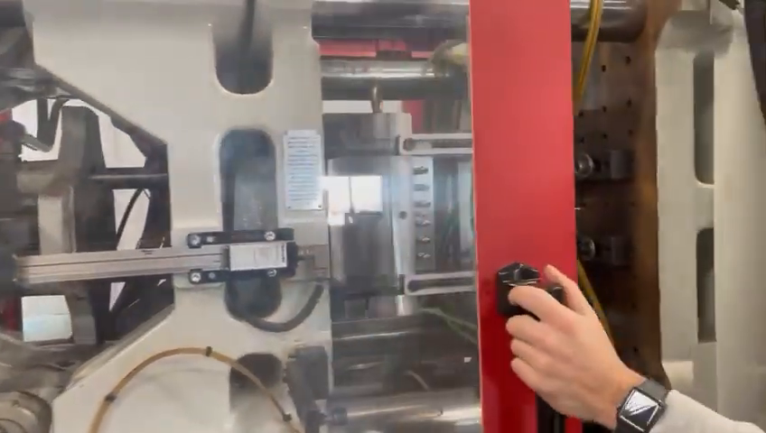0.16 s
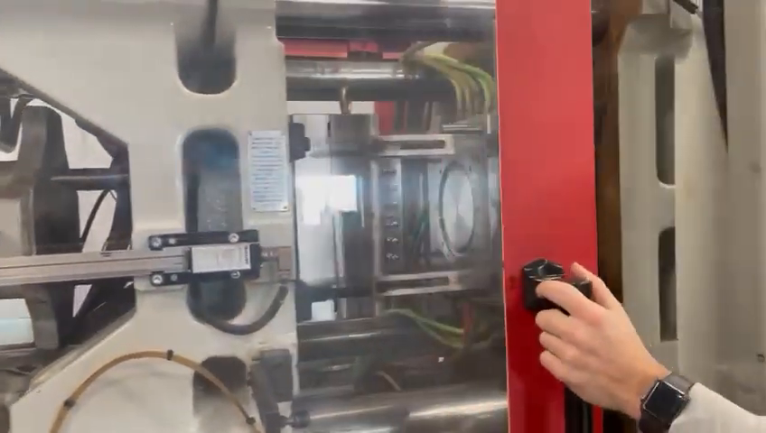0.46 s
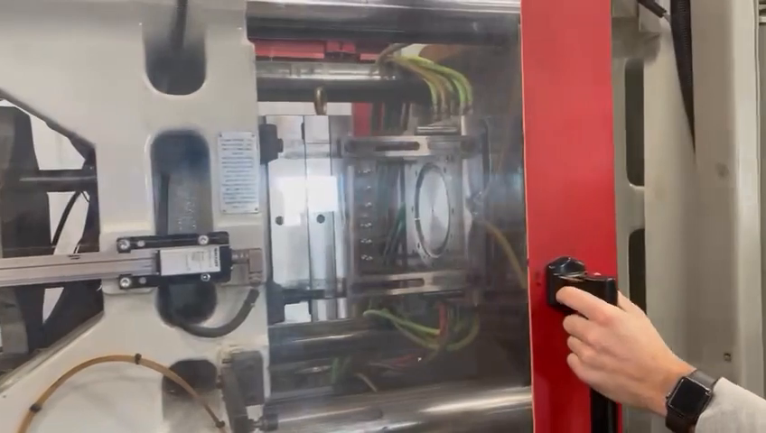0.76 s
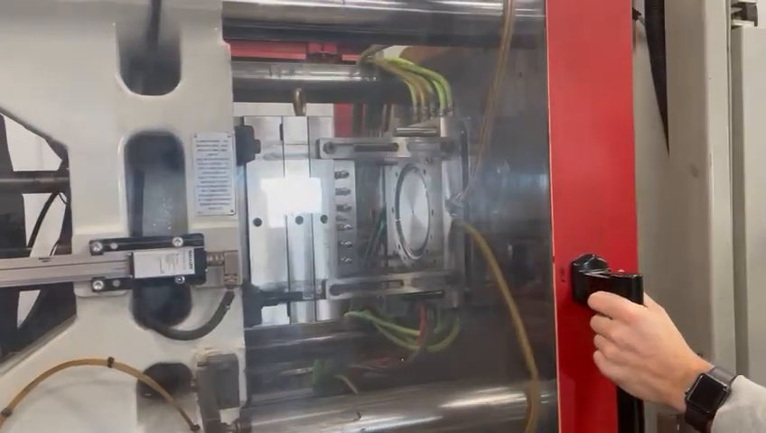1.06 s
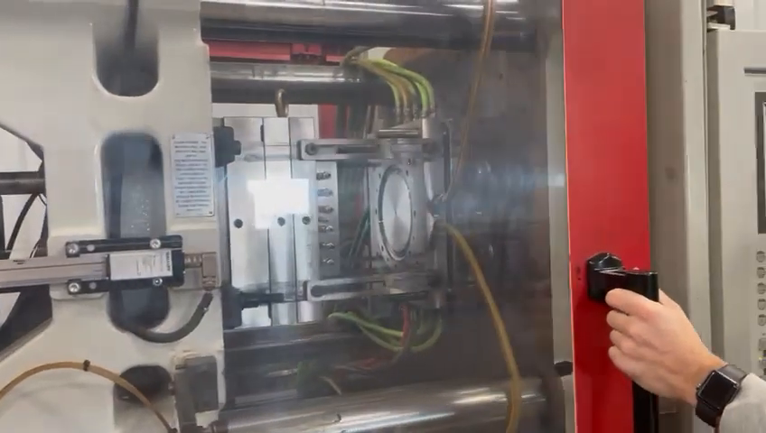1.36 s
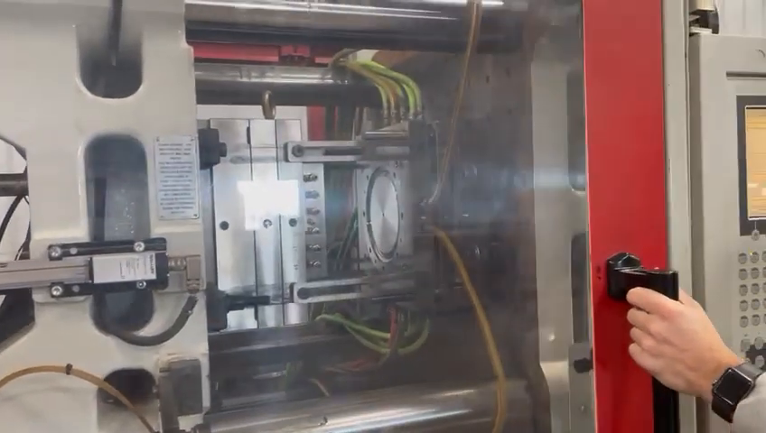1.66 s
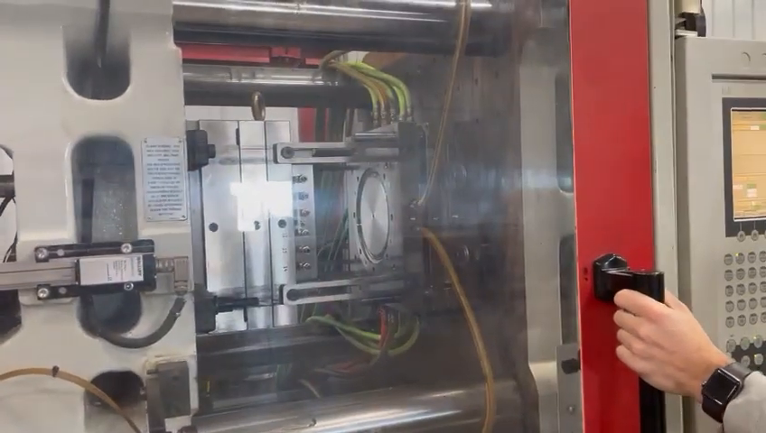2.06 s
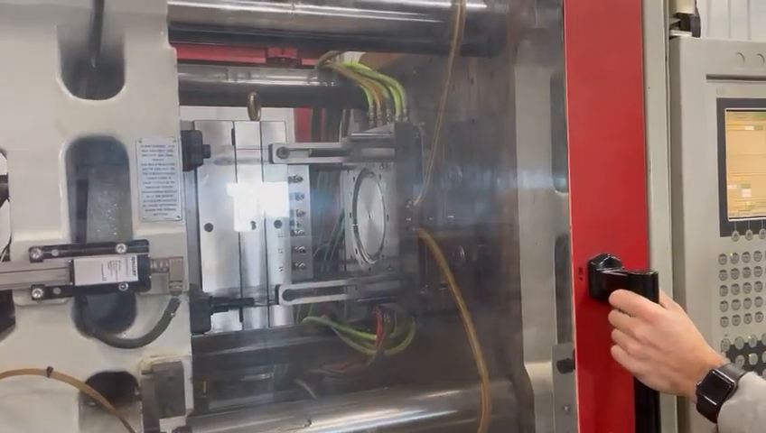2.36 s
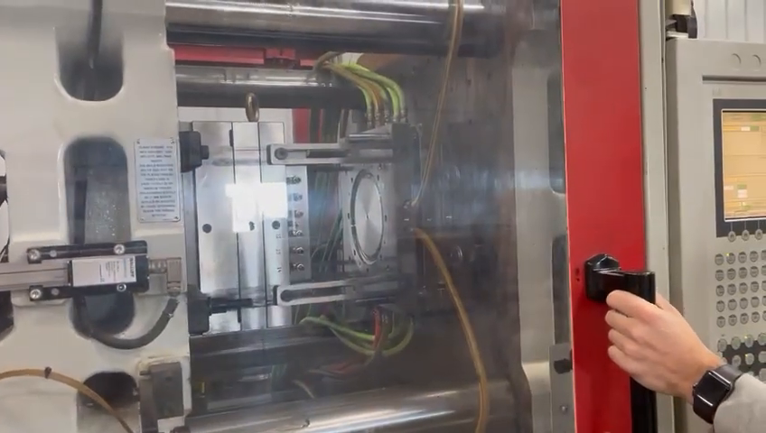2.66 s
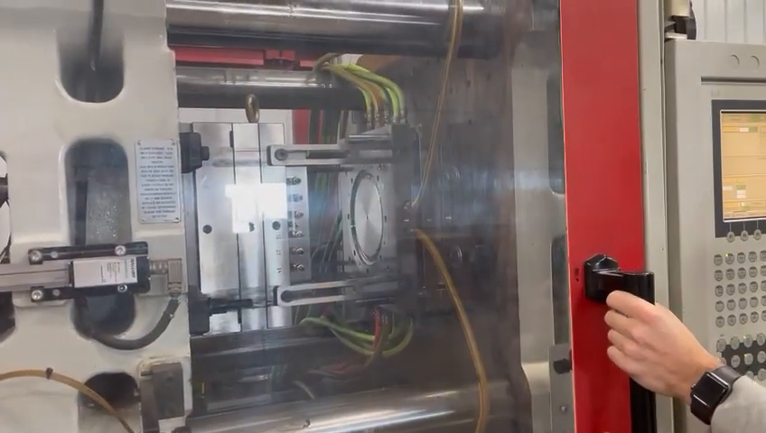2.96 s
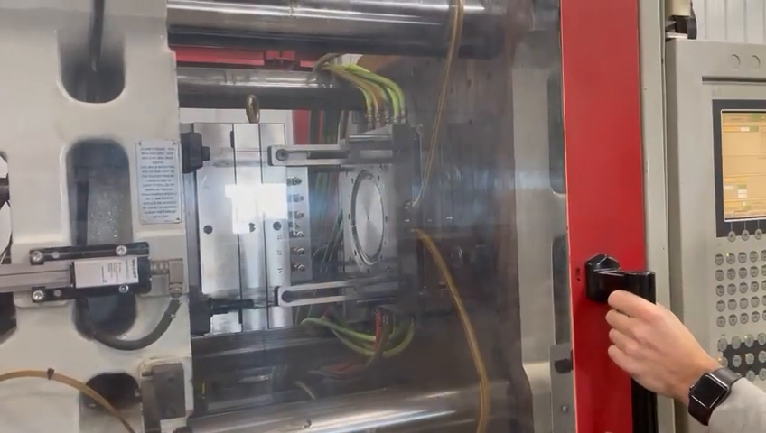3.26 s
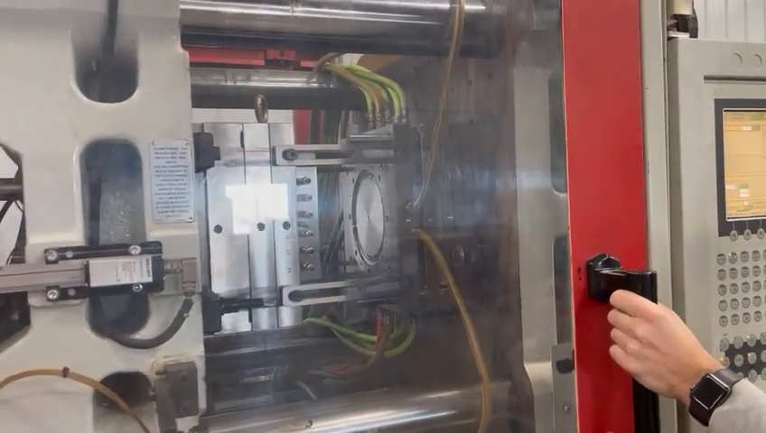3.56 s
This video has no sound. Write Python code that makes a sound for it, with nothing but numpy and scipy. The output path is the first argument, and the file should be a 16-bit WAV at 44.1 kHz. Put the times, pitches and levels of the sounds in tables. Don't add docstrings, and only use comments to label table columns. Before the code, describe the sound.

A sliding machine door rumbles and scrapes, then latches with three metallic clacks and a thud; motor hum and hall roar continue, and a burst of air and a heavy thump end it, heard close in stereo.

```python
import sys
import numpy as np
from scipy import signal
from scipy.fft import rfft, irfft
from scipy.io import wavfile
from scipy.ndimage import uniform_filter1d

SR = 44100
rng = np.random.default_rng(int(sys.argv[2]) if len(sys.argv) > 2 else 0)


def rack_gain(trim_db):
    fader = np.asarray(trim_db, float)
    return 10 ** (fader / 20)


def int16_out(signal):
    q = np.round(np.clip(np.atleast_2d(signal).T, -1, 1) * 32767)
    wavfile.write(sys.argv[1], SR, q.astype(np.int16))


N = 163170
SIZE = 3 * 2 ** 16
FREQ = np.fft.rfftfreq(SIZE, 1 / SR)
T = np.arange(N) / SR


def over_hz(table):
    hz, value = np.array(table).T
    return np.interp(np.log(FREQ + 1), np.log(hz), value)


def over_time(table):
    return np.interp(T, *np.array(table).T)


def shape(x, gain):
    return irfft(rfft(x, SIZE) * gain)[..., :N]


def unit(x):
    return x / np.sqrt(np.mean(x ** 2))


def noise(colour, channels=1):
    return unit(shape(rng.standard_normal((channels, N)), rack_gain(over_hz(colour))))


def resonance(hz, width_hz):
    return 1 / (1 + 2j * (FREQ - hz) / width_hz) ** 2


def walk(rate_hz):
    hold = max(int(SR / rate_hz), 2)
    steps = np.repeat(rng.standard_normal(N // hold + 1), hold)
    smooth = uniform_filter1d(uniform_filter1d(steps, hold), hold)
    return unit(smooth[:N])


def ring(x, hz, t60_s):
    radius = np.exp(-np.log(1000) / (t60_s * SR))
    turn = 2 * np.pi * hz / SR
    return signal.lfilter([np.sin(turn)], [1, -2 * radius * np.cos(turn), radius * radius], x)


def octaves(gain):
    white = rfft(rng.standard_normal((2, SIZE))) * gain
    for hz in 25 * 2 ** np.arange(0, 9.4, .66):
        distance = np.clip(np.log2((FREQ + 1) / hz) / .66, -1, 1)
        window = np.cos(distance * np.pi / 2) ** 2
        yield hz, irfft(white * window)[:, :N]


# hz, correlation (-1..1)
PORT_LIKENESS = [(60, .998), (130, .98), (270, .76), (600, .1), (1200, -.1), (2800, .5), (6200, .2),
                 (7000, -.995), (9100, -.995), (10000, .96)]


def spread(pair):
    likeness = np.clip(over_hz(PORT_LIKENESS), -1, 1)
    mid, side = shape(pair, np.sqrt(np.array([1 + likeness, 1 - likeness]) / 2))
    return np.array([mid + side, mid - side])


def tone(hz, level_db, wobble_db, drift=.002):
    phase = 2 * np.pi * (np.cumsum(hz * (1 + drift * walk(6))) / SR + rng.random())
    wobble = .6 * walk(7) + .8 * walk(np.clip(hz / 15., 8, 40))
    return np.sqrt(2) * rack_gain(level_db + wobble_db * wobble) * np.sin(phase)


# time_s, level_db
MOTOR_LEVEL = [(0, -45), (.04, -32), (.7, -34.5), (1.4, -36), (1.66, -34.5), (1.8, -38.5), (1.95, -33),
               (3.2, -31.5), (3.45, -33.5), (3.7, -33)]
# time_s, level_db
PUMP_LEVEL = [(0, -41.5), (.29, -49), (.5, -40.5), (.75, -44.5), (.9, -41.5), (1.47, -40.5), (1.78, -45.5),
              (1.95, -37.5), (2.3, -41), (3.1, -42.5), (3.7, -44)]
# multiple, level_db re first line, wobble_db
PISTON_ORDERS = [(1, 0, 1.5), (2, -8, 2), (4, -17, 2), (6, -17, 2.5), (7, -20, 2.5)]
# time_s, level_db
WHINE_LEVEL = [(0.0, -67), (0.02, -50), (0.13, -45.5), (0.31, -67), (0.36, -49), (0.53, -48), (0.77, -55.5),
               (0.94, -48.5), (1.26, -54), (1.29, -67), (1.32, -58), (1.48, -46.5), (2.59, -47.5),
               (3.2, -47.5)]
# pitch_hz, level_db, wobble_db
OTHER_DRIVES = [(120, -51, -3), (139.3, -54, -3.5), (243, -48.5, 6.5), (400.2, -46, 4), (698.6, -55, 3.5),
                (758.7, -49.5, 2)]
MOTOR_HZ, PISTON_HZ = 53.95, 372.9


def machines():
    lines = tone(MOTOR_HZ, over_time(MOTOR_LEVEL), 1.4, drift=.0023)
    for order, db, wobble_db in PISTON_ORDERS:
        level_db = over_time(PUMP_LEVEL) if order == 1 else db - 42
        lines = lines + tone(order * PISTON_HZ, level_db, wobble_db, drift=.00183)
    whine = tone(5 * PISTON_HZ, over_time(WHINE_LEVEL), 2, drift=.0012)
    lines = lines + whine * (T < WHINE_LEVEL[-1][0])
    return lines + sum(tone(hz, db, wobble_db, drift=.00411) for hz, db, wobble_db in OTHER_DRIVES)


# hz, density_db per Hz
HALL_COLOUR = [(25, -3), (70, -4), (220, -0.5), (520, -7), (1500, -13), (2700, -19.5), (4500, -28.5),
               (12000, -50)]
HALL_DB, SWELL_DB, FLICKER_DB = -37, .6, 1.5


def hall():
    swell = SWELL_DB * walk(3.34)
    bands = octaves(rack_gain(over_hz(HALL_COLOUR)))
    roar = sum(band * rack_gain(swell + FLICKER_DB * walk(7.84)) for _, band in bands)
    return spread(unit(roar)) * rack_gain(HALL_DB)


# time_s, level_db
ROLL_LEVEL = [(0, -42), (.31, -48.5), (.345, -39.5), (.42, -36.5), (.5, -35), (.6, -39.5), (.9, -47.5),
              (1.4, -49.5)]
# hz, density_db per Hz
ROLL_COLOUR = [(210, 4.5), (400, -3.5), (1500, -5.5), (1950, 2.5), (2500, -12), (6000, -19.5), (12000, -35)]
# pitch_hz, width_hz, level_db, start_s, end_s
RAIL_SCRAPES = [
    (1900, 350, -47, .345, .47),
    (203, 35, -42, -.01, .45),
]


def door():
    roll = noise(ROLL_COLOUR, channels=2) * rack_gain(over_time(ROLL_LEVEL) + 1.5 * walk(30))
    squeak = tone(2650, -54 - 25 * np.clip(T - .4, 0, 1), 2.5, drift=.0027)
    out = roll + squeak
    for hz, width_hz, db, start_s, end_s in RAIL_SCRAPES:
        rub = unit(shape(rng.standard_normal((2, N)), resonance(hz, width_hz)))
        fade = np.clip(np.minimum((T - start_s) / .01, (end_s - T) / .06), 0, 1)
        out = out + rack_gain(db) * rub * fade
    return out


# start_s, level_db, rise_s, rattle_decay_s, crack_db re rattle
CLACK_HITS = [
    (1.472, -25, .001, 0.0072, 7.5),
    (1.562, -23, .001, 0.02, -2.5),
    (1.682, -12.5, .0011, 0.0059, -1),
]
# pitch_hz, level_db, t60_s, swell_s
CATCH_MODES = [(2160, 4, .09, .001), (2550, -8, .04, .001), (2990, -7, .05, .001), (3800, -6, .04, .001),
               (4400, -8, .05, .001), (5300, -8, .05, .001), (8900, 0, .04, .001)]
STRIKER_MODES = [(950, -14, .08, .01), (1300, -6, .05, .005), (1497, 2, .17, .035), (2220, -1, .04, .002),
                 (2487, -6, .13, .03), (2724, -2, .13, .02), (3150, -5, .035, .001), (4172, -11, .1, .01),
                 (4409, -13, .1, .01), (5367, -12, .1, .005), (6735, -4, .07, .001), (9420, -9, .15, .005)]
LATCH_MODES = [(600, -18, .12, .01), (850, -13, .12, .01), (1100, -7, .13, .012), (1330, -1, .14, .015),
               (1470, -4, .14, .015), (1650, -9, .1, .01), (2250, -7, .1, .005), (2480, -2, .065, .002),
               (2720, 2, .03, .001), (3290, -13, .1, .005), (4156, -10, .06, .002), (6400, -8, .05, .001),
               (9324, -2, .15, .003), (10900, -15, .07, .002)]
# start_s, level_db re clack
REBOUNDS = [
    [(1.481, -9), (1.491, -15)],
    [(1.5676, -5), (1.579, -8), (1.594, -9), (1.604, -10), (1.617, -9), (1.671, -20), (1.676, -21)],
    [(1.688, -5), (1.704, -11), (1.714, -14), (1.733, -17), (1.743, -20), (1.753, -18), (1.776, -22)],
]
# hz, density_db per Hz
CRACK_COLOUR = [(600, -38), (1500, -24), (2000, -5), (2600, -1), (5000, -4), (8000, -3), (11000, -8),
                (13000, -18)]
REBOUND_S, BUZZ_DB, LOW_CUT_HZ = .004, -9, 450
CLUSTER_SPREAD, RING_SHARE = .022, .25


def clacks():
    out = 0
    parts = (CATCH_MODES, STRIKER_MODES, LATCH_MODES)
    for (start_s, db, rise_s, decay_s, crack_db), modes, rebounds in zip(CLACK_HITS, parts, REBOUNDS):
        t = np.clip(T - start_s, 0, None)
        onset = np.clip(t / rise_s, 0, 1)
        contact = onset * np.exp(-t / decay_s)
        for again_s, again_db in rebounds:
            rise = np.clip((T - again_s) / rise_s, 0, 1)
            contact = contact + rack_gain(again_db) * rise * np.exp(-np.abs(T - again_s) / REBOUND_S)
        grit = rng.standard_normal(N) * rack_gain(2 * walk(400))
        body = 0
        for hz, mode_db, t60_s, swell_s in modes:
            buzz = onset * rack_gain(BUZZ_DB - 60 * t / t60_s)
            swell = np.clip(t / max(swell_s, 1e-4), .1, 1)
            drive = grit * (contact + buzz) * swell
            spacing = CLUSTER_SPREAD * min(3000 / hz, 1) ** 2
            cluster = sum(ring(drive, hz * (1 + spacing * j), RING_SHARE * t60_s) for j in (-1, 0, 1))
            body = body + rack_gain(mode_db) * cluster
        body /= np.sqrt(uniform_filter1d(body ** 2, 441).max())
        crack = rack_gain(crack_db) * contact * noise(CRACK_COLOUR)[0]
        out = out + rack_gain(db) * (body + crack)
    return signal.sosfilt(signal.butter(4, LOW_CUT_HZ, "high", fs=SR, output="sos"), out)


# start_s, level_db, pitch_hz, t60_s
FRAME_THUDS = [
    (1.72, -31, 195.6, 0.17),
    (1.764, -23.5, 144.7, 0.14),
    (3.214, -43, 189, 0.12),
    (3.469, -21.5, 111.8, 0.52),
    (3.494, -20.5, 122.6, 0.21),
    (3.515, -23, 132, 0.17),
    (3.57, -26.5, 64.6, 0.23),
    (3.602, -26.5, 134.4, 0.12),
]
# multiple, level_db
FRAME_BODY = [(1, 0), (1.9, -6), (2.7, -12), (3.6, -22)]


def thuds():
    out = 0
    for start_s, db, hz, t60_s in FRAME_THUDS:
        push = np.clip(1 - np.abs(T - start_s - .002) / .0006, 0, 1)
        push = push / push.sum()
        body = sum(rack_gain(d) * ring(push, hz * k, t60_s / k ** .1) for k, d in FRAME_BODY)
        out = out + rack_gain(db) * body
    return 1.13 * out


# time_s, level_db
VALVE_LEVEL = [(3.195, -64), (3.222, -33.5), (3.23, -26.5), (3.276, -29.5), (3.29, -23), (3.33, -25),
               (3.375, -27.5), (3.42, -36), (3.5, -40.5), (3.7, -52)]
# pitch_hz, width_hz, level_db, start_s, fade_s
PIPE_MODES = [(880, 180, -10, 3.28, .1), (1170, 100, -4, 3.22, .2), (1490, 60, -5, 3.28, .2),
              (1780, 190, 5, 3.235, .14), (2000, 200, -4, 3.28, .12), (2540, 150, -8, 3.22, .2),
              (3070, 90, -8, 3.28, .15), (3800, 400, 0, 3.278, .07), (4000, 420, 2, 3.335, .16),
              (4600, 300, -11, 3.28, .2), (6700, 350, -8, 3.23, .3), (10200, 450, -11, 3.23, .12),
              (11100, 90, -8, 3.225, .06)]
# hz, density_db per Hz
JET_COLOUR = [(300, -16), (900, -2.5), (2000, -1), (4000, -11), (6500, -12), (8000, -12), (10600, -29.5),
              (11400, -57)]
JET_DB, PATCHY_DB = -1.5, 2.5
PUFF_S, PUFF_DB, PUFF_LENGTH_S = 3.208, -50, .012
WHISTLE_HZ, WHISTLE_DB, WHISTLE_S = 8100, -49, 3


def valve():
    air = rng.standard_normal((2, N))
    pipes = 0
    for hz, width_hz, db, start_s, fade_s in PIPE_MODES:
        opening = np.clip((T - start_s) / .02, .1, 1)
        fade = np.exp(-np.clip(T - start_s, 0, 1) / fade_s)
        pipe = shape(air, rack_gain(db) * resonance(hz, width_hz))
        pipes = pipes + pipe * opening * fade * rack_gain(PATCHY_DB * walk(45))
    puff = rack_gain(PUFF_DB) * air * np.exp(-((T - PUFF_S) / PUFF_LENGTH_S) ** 2)
    flutter_db = .8 * walk(50) + 1.5 * walk(400)
    blast = 6.0 * pipes + rack_gain(JET_DB) * noise(JET_COLOUR, channels=2)
    blast = blast * rack_gain(over_time(VALVE_LEVEL) + flutter_db) * (T > VALVE_LEVEL[0][0])
    whistle = tone(WHISTLE_HZ, WHISTLE_DB, 2.4, drift=.001) * np.clip((T - WHISTLE_S) / .027, 0, 1)
    return blast + puff, whistle


# hz, t60_s
HALL_T60 = [(150, 2.7), (1300, 1.9), (2600, .7), (6000, .6), (12000, 0.24)]
PREDELAY_S = .0091


def echo(x):
    t60_s = over_hz(HALL_T60)
    tail = sum(band * rack_gain(-60 * T / t60_s[np.searchsorted(FREQ, hz)]) for hz, band in octaves(1))
    tail = tail * np.clip(T / PREDELAY_S, 0, 1) ** 2
    return spread(shape(x, rfft(unit(tail) / np.sqrt(N), SIZE)))


# hz, left_lead_rad
PORT_LEAD = [(60, -.05), (160, -.2), (430, -.7), (1030, -1.5), (1900, -1.4), (2600, -1), (5600, -1.2),
             (7000, -2.4), (8200, -2.8), (9200, -2.1), (10200, -.3)]


def direct(x):
    turn = np.exp(.5j * over_hz(PORT_LEAD))
    return shape(x, np.array([turn, turn.conj()]))


# hz, left_minus_right_db
PORT_BALANCE = [(130, 0), (350, -4), (630, -4), (1130, -2), (2040, -3), (5500, -2), (6900, 0)]
WET_DB = -9


def scene():
    hits = clacks()
    air, whistle = valve()
    near = direct(hits + thuds() + machines() + whistle)
    wide = spread(air + door()) + rack_gain(WET_DB) * echo(hits + air[0]) + hall()
    half_pan_db = over_hz(PORT_BALANCE) / 2
    return shape(near + wide, rack_gain(np.array([half_pan_db, -half_pan_db])))


def low_pass(x):
    return signal.sosfilt(signal.butter(12, 12520, fs=SR, output="sos"), x)


def record(dry):
    rounded = np.tanh(dry / 1.5) * 1.5
    treble_edge = 1 / np.sqrt(1 + (FREQ / 11750) ** 160)
    mix = shape(rounded, treble_edge)
    return low_pass(mix)


dry = scene()
out = record(dry)
int16_out(out)
```